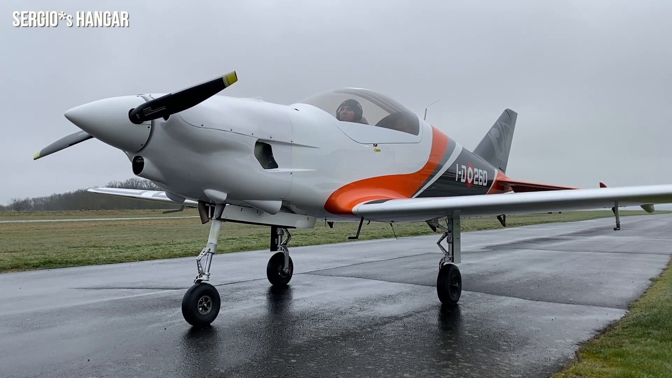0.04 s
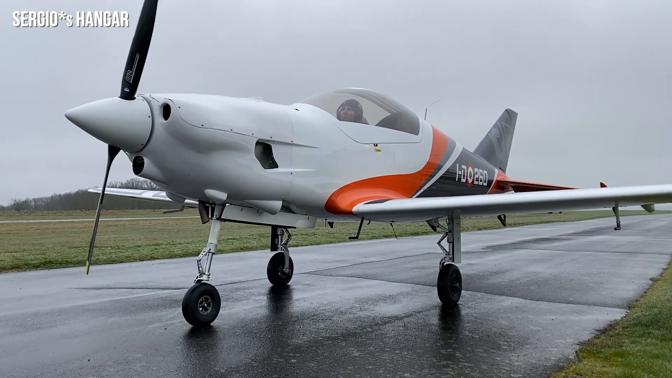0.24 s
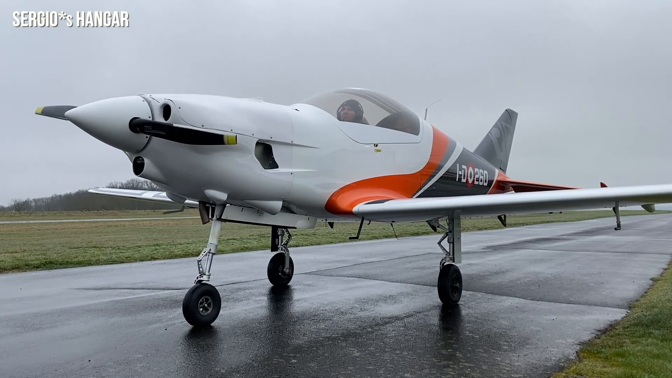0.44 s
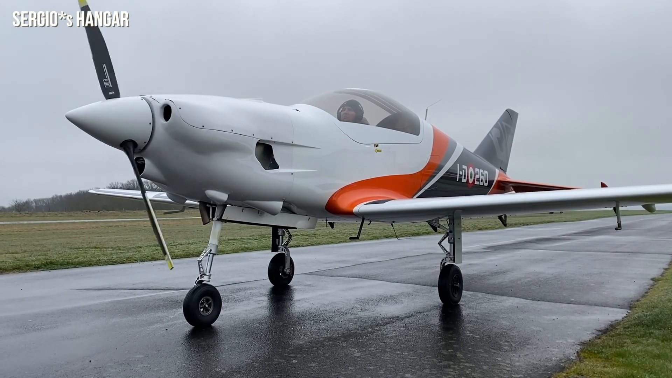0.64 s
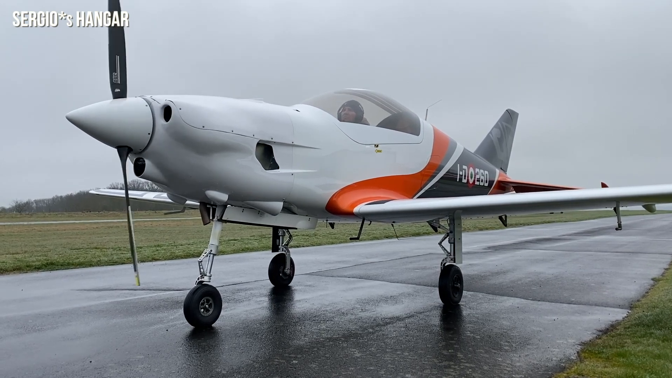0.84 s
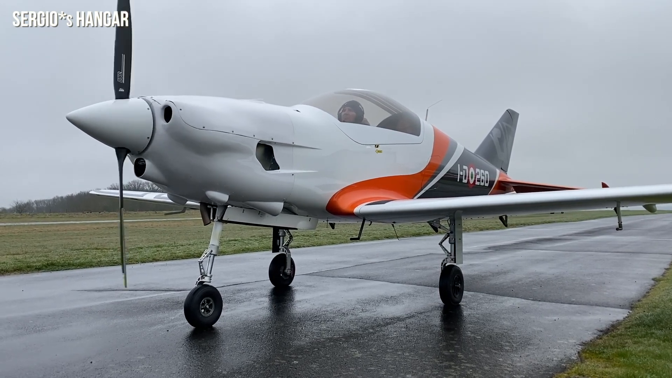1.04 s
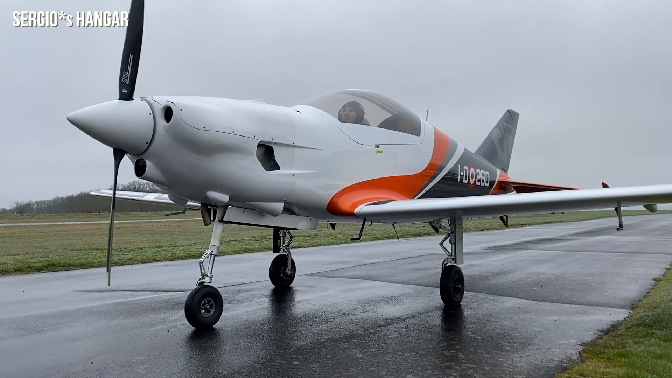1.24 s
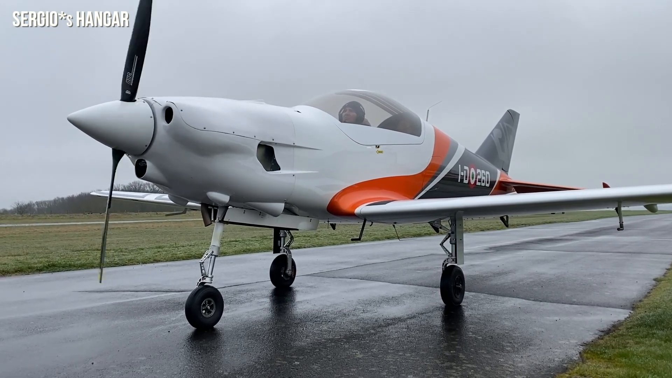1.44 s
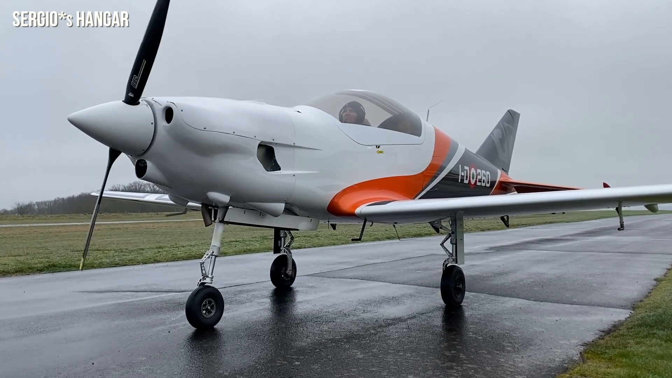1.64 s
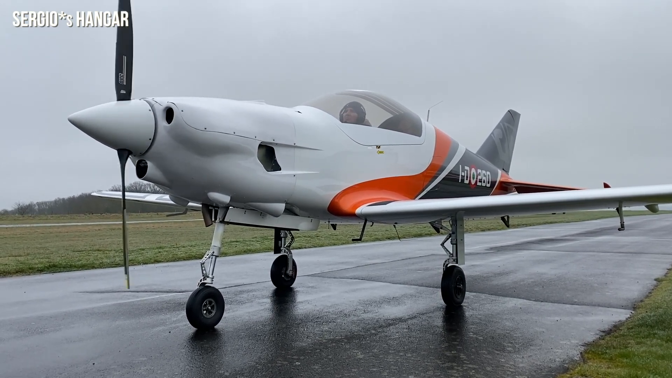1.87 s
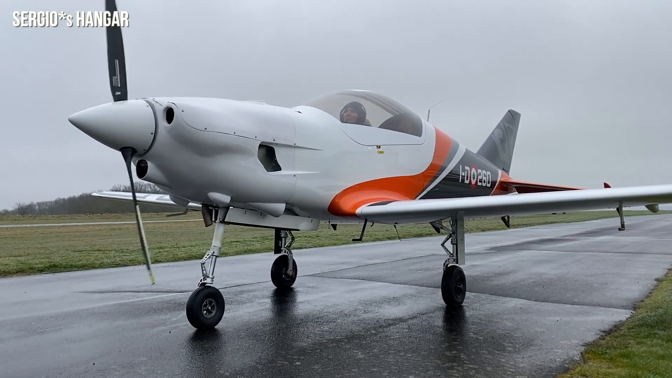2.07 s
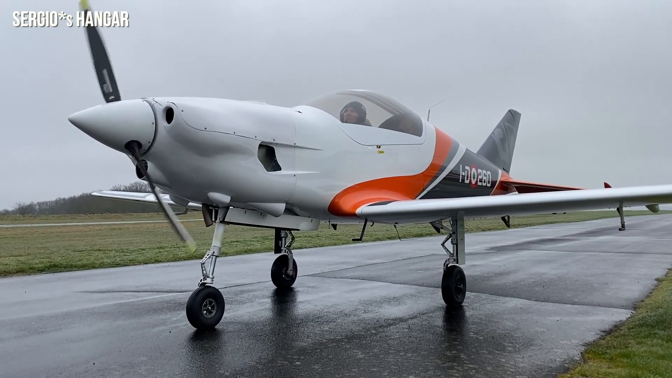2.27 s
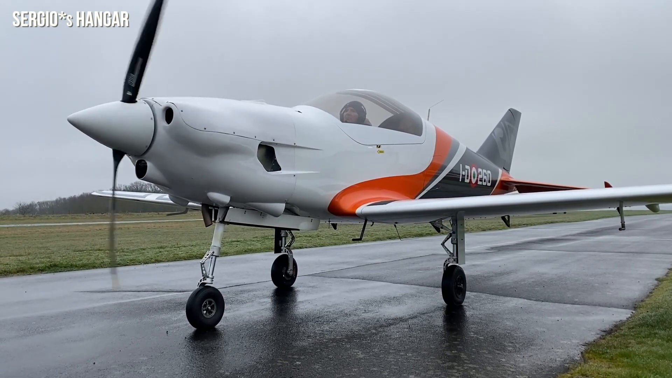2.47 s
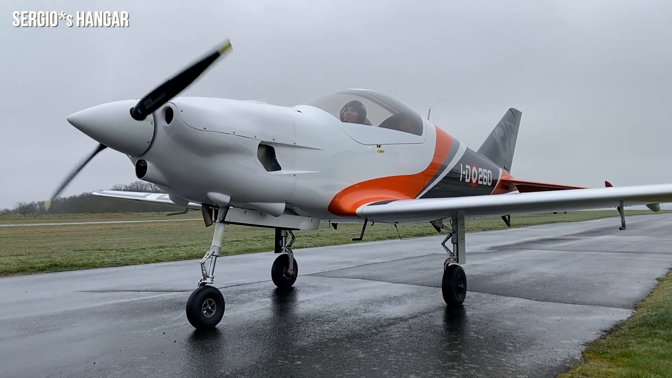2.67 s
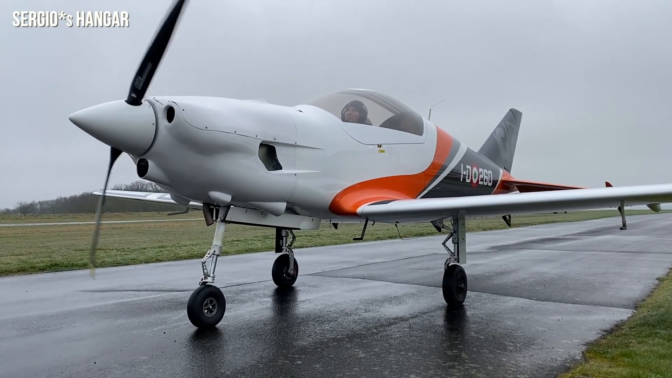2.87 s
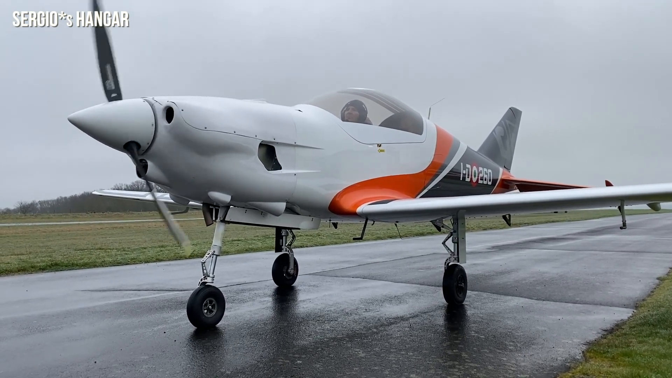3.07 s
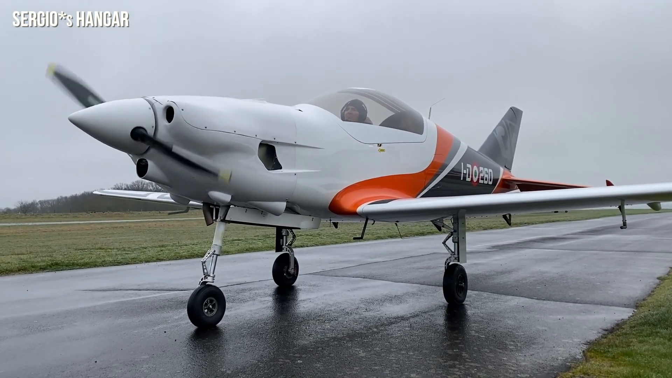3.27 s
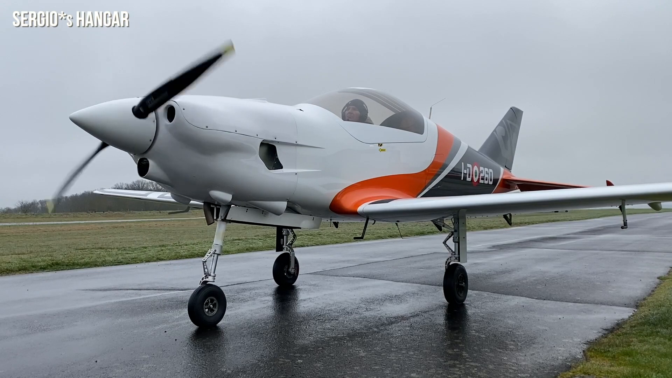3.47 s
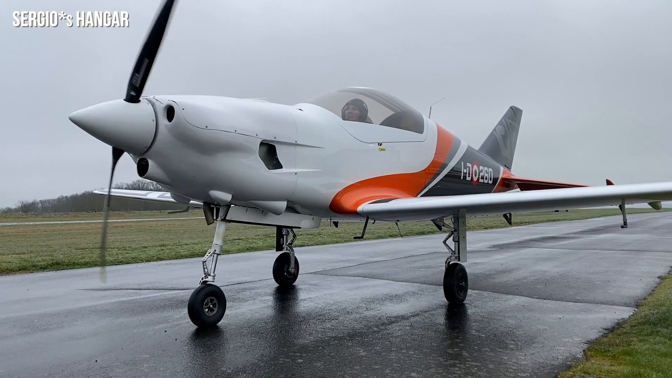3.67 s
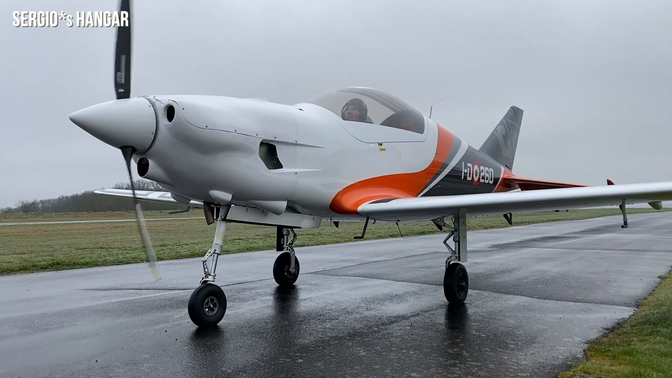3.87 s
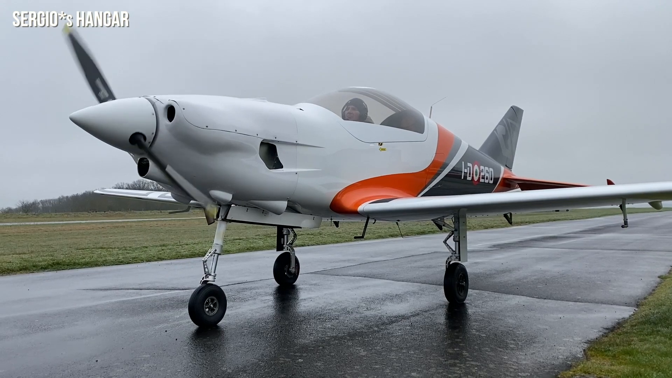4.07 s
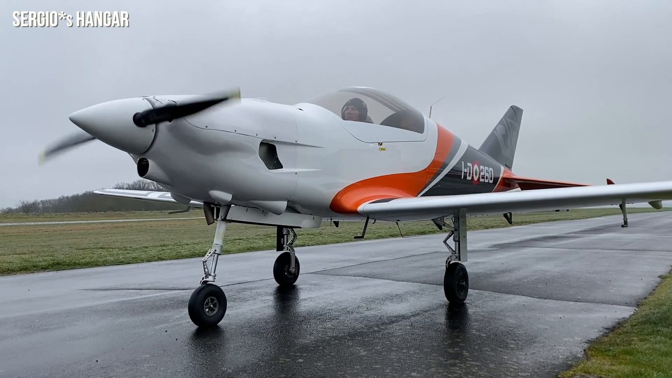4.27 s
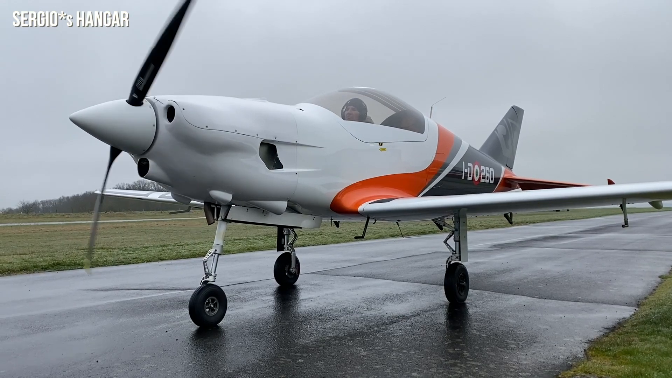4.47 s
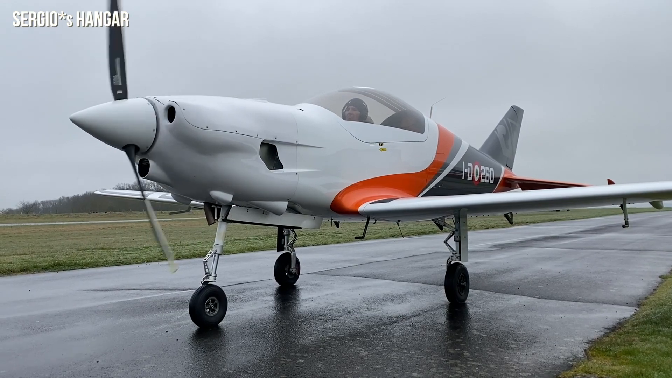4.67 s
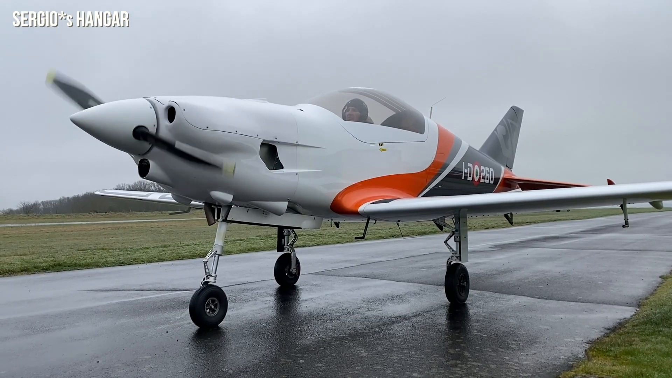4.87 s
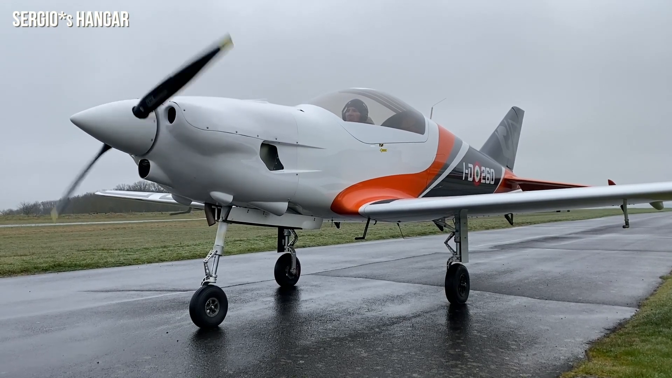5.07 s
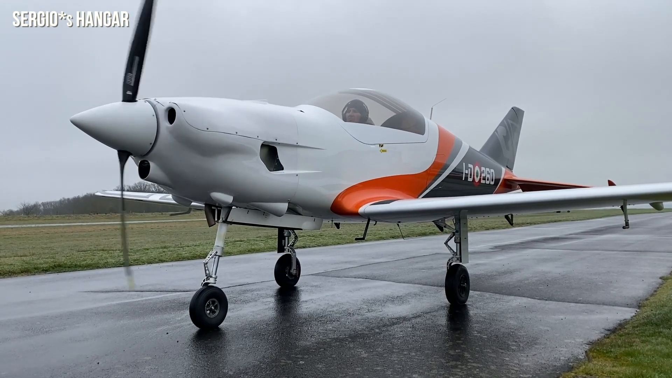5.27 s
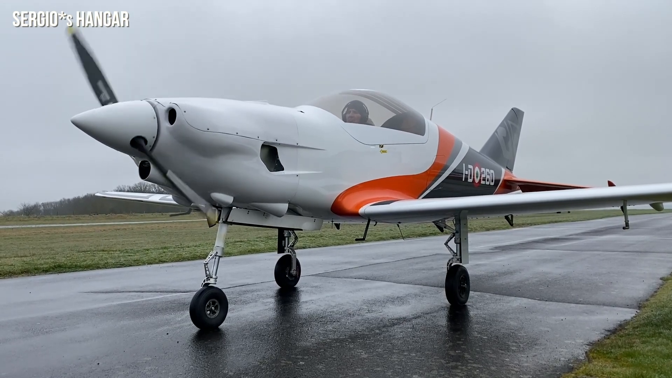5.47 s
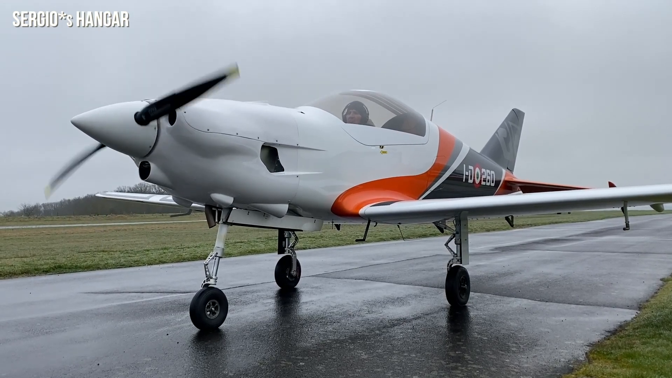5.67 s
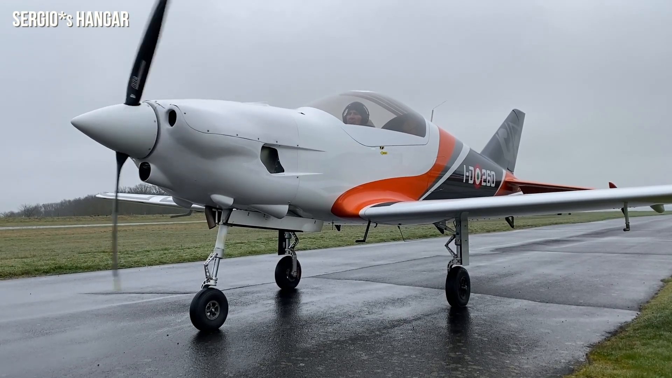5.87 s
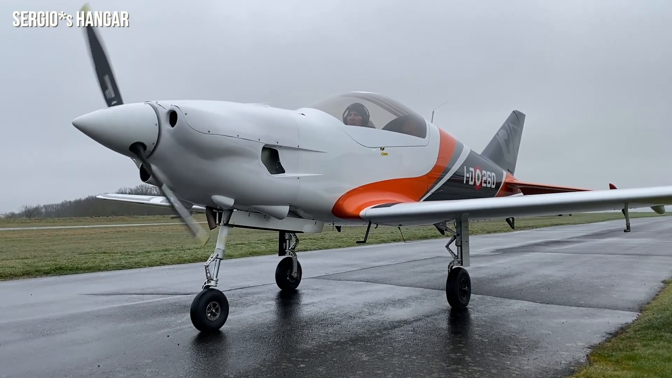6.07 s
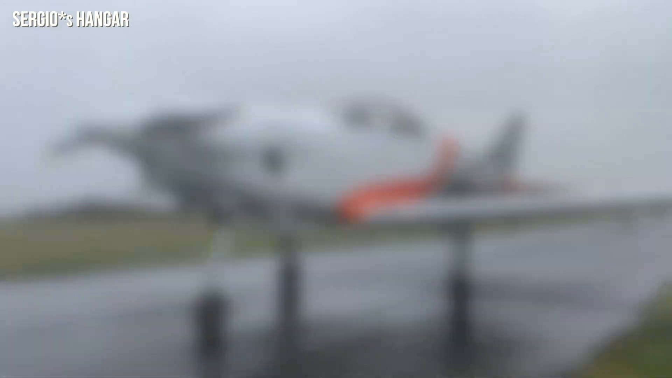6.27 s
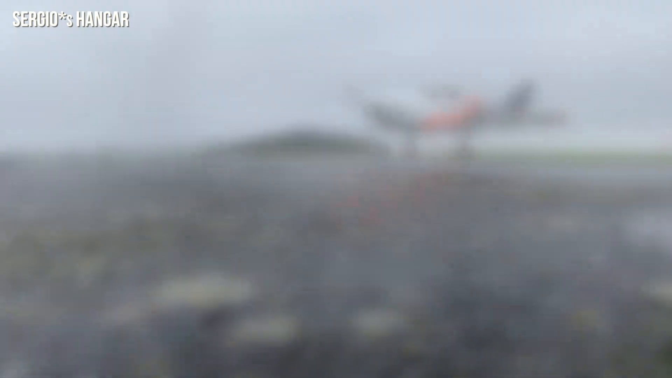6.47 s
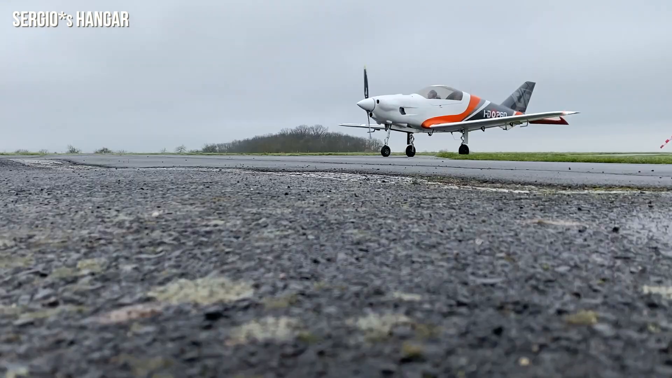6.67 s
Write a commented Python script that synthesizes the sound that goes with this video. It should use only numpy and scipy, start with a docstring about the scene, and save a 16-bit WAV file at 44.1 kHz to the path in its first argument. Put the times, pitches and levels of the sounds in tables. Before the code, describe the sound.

A small propeller aircraft starts up outdoors, a few metres from a stereo microphone. Over a faint fuel pump whine, the starter clacks in and cranks with a rhythmic, whining gear clatter. After about two seconds the engine fires with spits and low booms, stumbles briefly, then settles into a loud, steady idle of exhaust thumps, propeller slaps, hiss and valve rattle.

```python
"""A six-cylinder light aircraft engine starts on a wet apron, a few metres from a stereo pair.
A fuel pump whines, the starter clacks in and labours over each compression. The first firings spit
and boom from the exhaust; the engine stumbles twice and settles into three exhaust thumps and two
propeller blade slaps a turn, with gas hiss, valve rattle and now and then a harder, ringing slap."""
import sys
import numpy as np
from scipy import signal
from scipy.fft import rfft, irfft, next_fast_len
from scipy.io import wavfile
from scipy.ndimage import uniform_filter1d

SR = 44100
rng = np.random.default_rng(int(sys.argv[2]) if len(sys.argv) > 2 else 0)


def dump_mix(stems):
    """Bounce the given channels to the path in sys.argv[1] as a 16-bit WAV at rate SR."""
    frames = np.atleast_2d(stems).T  # one column per channel
    limited = np.clip(frames, -1, 1)  # hard clip at full scale
    pcm = np.round(limited * 32767).astype(np.int16)
    wavfile.write(sys.argv[1], SR, pcm)


N = 296352
T = np.arange(N) / SR

# The hardest blade slaps. Each row: start in seconds, peak in dB, pitch in Hz.
HARD_SLAPS = [(3.235, -14, 549), (3.263, -13, 603), (3.369, -13, 536), (3.397, -12, 544), (3.426, -10, 622),
              (3.454, -11, 622), (3.483, -10, 544), (3.593, -14, 514), (3.62, -13, 568), (3.704, -12, 533),
              (3.84, -12, 552), (3.927, -12, 641), (3.953, -11, 643), (3.983, -12, 641), (4.01, -13, 595),
              (4.038, -11, 544), (4.066, -12, 608), (4.149, -13, 536), (4.202, -15, 546), (4.228, -13, 474),
              (4.287, -11, 546), (4.311, -14, 415), (4.339, -13, 487), (4.529, -14, 560), (4.559, -13, 611),
              (4.587, -13, 541), (4.615, -12, 549), (4.641, -13, 501), (4.809, -15, 619), (4.836, -13, 627),
              (4.863, -12, 692), (5.034, -11, 1030), (5.089, -11, 991), (5.11, -14, 554), (5.14, -14, 735),
              (5.331, -14, 1110), (5.412, -14, 611), (5.442, -13, 1100), (5.496, -12, 444),
              (5.766, -13, 665), (5.876, -13, 565), (6.095, -11, 423), (6.123, -11, 431), (6.233, -14, 552),
              (6.261, -13, 732), (6.315, -11, 721), (6.37, -12, 525), (6.399, -12, 703), (6.425, -12, 565),
              (6.563, -10, 554)]


def undb(db):
    return 10 ** (np.asarray(db) / 20)


def unit(x):
    return x / np.sqrt(np.mean(x ** 2))


def noise():
    """Two unrelated rows: direct sound for both channels, scattered sound for the right alone."""
    return rng.standard_normal((2, N))


def direct(x):
    """A sound with no scattered part."""
    return np.array([x, 0 * x])


def with_echo(x, delay_s=.016):
    """A sound and its scattered return from the apron and airframe."""
    return np.array([x, np.interp(T - delay_s, T, x)])


def lowpass(x, hz, poles):
    return signal.sosfilt(signal.butter(poles, hz, fs=SR, output="sos"), x)


def colour(x, points):
    """Causal EQ through (Hz, dB) points, built from the cepstrum of the log gain."""
    hz, db = np.transpose(points)
    curve_db = np.interp(np.log(np.arange(4097) * SR / 8192 + 1), np.log(hz), db)
    cepstrum = irfft(np.log(undb(curve_db)))
    cepstrum[1:4096] *= 2
    impulse = irfft(np.exp(rfft(cepstrum[:4097], 8192)))
    return signal.fftconvolve(x, impulse[None], axes=1)[:, :N]


def ring(x, modes):
    """Parallel (Hz, width Hz, dB) resonances; alternate signs fill the gaps between them."""
    return sum((-1) ** k * undb(db) * signal.lfilter(*signal.iirpeak(hz, hz / width, SR), x)
               for k, (hz, width, db) in enumerate(modes))


def wander(rate):
    """Random values joined by straight lines, rate times a second."""
    count = int(T[-1] * rate) + 2
    return np.interp(T, np.arange(count) / rate, rng.standard_normal(count))


def flicker(rate, db):
    """Gain that wanders by about db."""
    return undb(db * wander(rate))


def burst(start, db, t60_s, rise_s):
    """Envelope of a sudden outburst that dies away."""
    age = np.maximum(T - start, 0)
    return undb(db - 60 * age / t60_s) * (1 - np.exp(-age / rise_s))


def beats(count, scatter_db):
    """Pulses where count passes a whole number, the phase since, and the size of the current beat."""
    beat = np.floor(count).astype(int) + 1
    size = undb(scatter_db * rng.standard_normal(beat.max() + 1))[beat]
    return size * np.diff(beat, prepend=beat[0]), count % 1, size


def airfield():
    """Quiet open air, mostly low rumble."""
    # Each row: frequency in Hz, relative level in dB.
    air_eq = [(18, -65), (30, 1), (266, -1), (1320, -32), (1970, -16), (2730, -36), (3600, -22.5),
              (6910, -35), (8660, -34), (9580, -26), (12000, -50), (15600, -92), (22000, -120)]
    return undb(-43) * unit(colour(noise(), air_eq))


def fuel_pump():
    """The pump's thin, steady whine."""
    # Each row: pitch in Hz, relative level in dB.
    partials = [(979.8, -63), (1125, -63), (1470, -59), (1960, -59.5)]
    return direct(sum(undb(db + 9) * np.sin(2 * np.pi * (hz * T + rng.random())) for hz, db in partials))


def clacks():
    """The solenoid throws the pinion into the ring gear, where it knocks again as the load reverses."""
    # Each row: start in seconds, level in dB.
    knocks = [(0.099, -15.5), (0.1335, -14.5), (0.590, -34), (0.8999, -30), (1.186, -35), (1.3179, -30)]
    # Each row: frequency in Hz, relative level in dB.
    knock_eq = [(300, -7), (1000, 3), (2500, -5.5), (6000, -11.5), (10000, -13), (12000, -22), (15000, -38)]
    envelope = sum(burst(start, db, t60_s=.11, rise_s=.0089) for start, db in knocks)
    return envelope * unit(colour(noise(), knock_eq))


def gear_hum(phase):
    """Narrow noise on the mesh rate: it falls as compression slows the starter, and blooms mid-stroke."""
    fast_hz, slow_hz, bloom_db = 304, 222.2, 8
    mesh_hz = fast_hz + (slow_hz - fast_hz) / (1 + np.exp((.3 - phase) / .043))
    angle = 2 * np.pi * np.cumsum(mesh_hz) / SR
    drift = lowpass(noise(), hz=20.3, poles=2)
    bloom = undb(bloom_db * np.exp(-((phase - .58) / .28) ** 2))
    return direct(bloom * unit(drift[0] * np.cos(angle) + drift[1] * np.sin(angle)))


def gear_clatter(phase, cranking):
    """Teeth ring the case and pinion: a whine that falls over each stroke, and a bright rasp."""
    # Resonances. Each row: pitch in Hz, width in Hz, gain in dB.
    case_modes = [(476, 32, -3), (623, 32, -2), (637, 103, -2.5), (725, 42, 4), (1000, 92, -7.5),
                  (1078, 73, -1), (1264, 96, -10), (1552, 75, -7)]
    pinion_modes = [(1885, 130, 2.5), (2340, 380, -4.5), (3280, 490, -4.5), (4870, 55, -1.5),
                    (5520, 260, -7), (7200, 1900, -13), (9750, 850, -19)]
    teeth = flicker(400, 1.6) * flicker(36.5, .39)
    case, pinion = (sum(flicker(16, 1.7) * ring(teeth * noise(), [mode]) for mode in modes)
                    for modes in (case_modes, pinion_modes))
    read_at = np.cumsum(1 + .057 * cranking * (.5 - phase))  # varispeed bends the pitch
    whine = unit(np.array([np.interp(read_at, np.arange(N), row) for row in case]))
    rasp = flicker(29.94, 1.8) * unit(lowpass(pinion, hz=11000, poles=6))  # dulled by the cowling
    return whine, rasp


def starter(off_s=2.2):
    """Past each top dead centre the gears race and clatter, then sag under the next compression."""
    # Each row: start in seconds, level in dB, relative sag in dB, rise in seconds, treble lift in dB.
    strokes = [(0.129, -22.5, 2.5, 0.0054, -2), (0.268, -21, 0.5, 0.043, -4), (0.413, -29, 2, 0.0051, -4.5),
               (0.577, -22.5, 5, 0.0047, 2.5), (0.738, -23, 5, 0.0056, 1), (0.893, -21.5, 6.5, 0.0044, 3),
               (1.043, -22, 6, 0.0075, 3), (1.183, -21, 4, 0.0021, -1), (1.315, -23, 5, 0.0045, 2),
               (1.459, -22, 6, 0.0036, 1), (1.596, -23, 5, 0.007, 1.5), (1.735, -21.5, 6, 0.0045, 3.5),
               (1.878, -20.5, 5, 0.0053, 1), (2.008, -23, 1.5, 0.0034, 2.5)]
    # The rocking airframe. Each row: pitch in Hz, width in Hz, gain in dB.
    airframe_modes = [(56.7, 10.4, 3.5), (115, 12, -1), (159, 92, -9.5), (228.6, 12, -4)]
    start, db, sag, rise, bright = np.transpose(strokes)
    count = len(start)
    place = np.interp(T, np.append(start, off_s), np.arange(count + 1), left=-1)
    k, phase = np.clip(place.astype(int), 0, count - 1), place % 1
    cranking = (place >= 0) & (place < count)

    def envelope(lift_db, depth, droop):
        """Each stroke climbs from where the last one ended, then droops."""
        peak = db + lift_db
        last_end = np.roll(peak - depth * sag * droop[-1], 1)
        climb = (last_end - peak)[k] * np.exp(-np.abs(T - start[k]) / rise[k])
        return uniform_filter1d(cranking * undb(peak[k] + climb - depth * sag[k] * droop[:-1]), size=200)

    span = np.append(phase, 1)  # the extra point is the end of a stroke
    late_droop = 1 / (1 + np.exp((.6 - span) / .077))
    early_droop = np.sin(2.4 * span)  # the treble dips sooner and partly recovers
    sluggish_db = 4.5 * np.exp((start[0] - start) / .33)  # fades as the gears gather speed
    first_bass_db = 6.5 * (start == start[0])  # the first stroke carries extra bass
    hum_db = -14.5 - .61 * sluggish_db + 3.2 * rng.standard_normal(count)
    hum = envelope(hum_db, 1.3, late_droop) * gear_hum(phase)
    rocking = envelope(-7.5 + first_bass_db, 1, late_droop) * unit(ring(noise(), airframe_modes))
    whine, rasp = gear_clatter(phase, cranking)
    return (hum + rocking + envelope(-6.5, 1.6, late_droop) * whine
            + envelope(-13.5 - sluggish_db + bright, 1.43, early_droop) * rasp)


def crank_order(k, db, angle):
    """One crank harmonic: firings and blades dip together and rebound, the uneven cylinder comes late."""
    rebound_rad, late_rad = .45, .22
    in_step = k % 3 == 0 or (k % 2 == 0 and k > 7)
    offset = rebound_rad if in_step else -k * late_rad
    slip = .035 * wander(2.5)  # timing drifts, so high orders lose step first
    waver = flicker(9, 1 if k == 3 else 1.6)  # the firing order is steadiest
    return -undb(db) * waver * np.cos(k * (angle + slip) + offset)


def drone(turns, thump, upper_lift, growl, buzz):
    """The pitched engine in four bands of crank harmonics: threes are firings, twos are blades."""
    # Each row: multiple of the crank rate, level within its band in dB.
    orders = [(1, -24), (2, -1.5), (3, 9.5), (4, -1), (5, -9.5), (6, -5), (7, -14), (8, -16), (9, -16),
              (10, -10), (11, -26), (12, -6), (13, -17), (14, -11), (15, -12.5), (16, -8.5), (17, -54),
              (18, -21.5), (19, -38), (20, -18), (21, -58), (22, -13.5), (23, -55), (24, -20.5), (25, -37),
              (26, -14.5), (27, -39), (28, -32), (29, -18), (30, -16.5), (31, -58), (32, -24.5), (33, -44),
              (34, -14.5)]
    _, _, size = beats(3 * turns, scatter_db=.99)
    angle = 2 * np.pi * (turns - .86)  # zero where firing and blade meet
    deep, upper, middle, high = (unit(sum(crank_order(k, db, angle) for k, db in band))
                                 for band in (orders[:4], orders[4:8], orders[8:17], orders[17:]))
    low = undb(-3) * deep + undb(-3.5) * upper_lift * upper
    tone = thump * low + undb(-1.5) * growl * middle + undb(-4) * buzz * high
    return with_echo(uniform_filter1d(size, size=200) * tone)


def propeller(turns, level, ring_lift):
    """Each blade slaps the air with a crack and a pitched ring, and drags a wash behind it."""
    # Air torn by the blades. Each row: frequency in Hz, relative level in dB.
    wash_eq = [(30, 3.5), (90, 2.5), (280, -8.5), (350, -20.5), (620, 0), (830, -10), (1050, -2.5),
               (1700, -9), (2000, 3), (3000, -44.5), (4000, -49)]
    # Each row: pitch in Hz, width in Hz, gain in dB.
    slap_modes = [(540, 320, 4), (676, 51, 16), (685, 38, 8), (1100, 92, -14), (1547, 86, 14.5),
                  (2140, 160, -15)]
    pulses, phase, size = beats(2 * turns - .66, scatter_db=.8)
    sweep = size * np.exp(-((phase + .5) % 1 - .55) ** 2 / .022)  # loudest as a blade sweeps nearest
    wash = unit(colour((.5 + sweep) * flicker(14, .99) * noise(), wash_eq))
    wash /= ring_lift ** .34  # thins as the ring grows
    torn_air = sweep ** 2 * noise()
    crack = unit(sum(flicker(18, 3.5) * ring(torn_air, [mode]) for mode in slap_modes))
    tone = undb(-8.5) * level * ring_lift * unit(ring(-pulses, slap_modes))
    return with_echo(tone) + level * (undb(2.5) * wash + undb(-7) * crack)


def gas_and_valves(turns):
    """Each firing pushes out a puff of hissing gas and rattles the valve gear."""
    # Each row: frequency in Hz, relative level in dB.
    gas_eq = [(1200, 5), (2300, -2.5), (3050, -4.5), (3700, -7), (5500, -5), (6500, -8), (8500, -6),
              (10000, -6.5), (12000, -13), (13500, -21), (15000, -27), (15400, -46)]
    # Each row: pitch in Hz, width in Hz, gain in dB.
    valve_modes = [(2390, 88, -17), (3026, 300, 5), (5700, 330, 3)]
    _, phase, size = beats(3 * turns - .68, scatter_db=3)
    puff = size * np.exp(-phase / .4) * np.minimum(phase / .029, 1)
    gas = unit(colour((2 + puff) * flicker(16, .067) * noise(), gas_eq))
    rattle = unit(ring((1.6 + puff) * flicker(150, 5.1) * noise(), valve_modes))
    return undb(7.5) * gas + undb(-6) * rattle


def slap_ducking(depth=.6, width_s=.012):
    """Gain that dips the ordinary slap wherever a hard one sounds."""
    dips = sum(np.exp(-((T - start) / width_s - .4) ** 2) for start, *_ in HARD_SLAPS)
    return 1 - depth * np.minimum(dips, 1)


def engine():
    """The engine catches, stumbles and idles; one crank times the blades, gas and drone."""
    # Each row: time in seconds, crank speed in turns per second.
    speed = [(2.1, 5.46), (2.22, 10.82), (2.32, 14.21), (2.38, 16.77), (2.47, 17.96), (2.58, 21.2),
             (2.63, 16.87), (2.73, 14.41), (2.78, 17.95), (2.83, 14.42), (2.9, 17.47), (3.05, 18.7),
             (3.2, 17.92), (3.3, 17.95), (3.42, 18.2), (3.62, 18.15), (3.85, 17.88), (4.15, 18.12),
             (4.5, 18.2), (5.7, 18.27), (6.72, 18.25)]
    # Each row: time in seconds, then firing strength, propeller load and growl in dB against idle.
    effort = [(2.133, -12, -6, -20), (2.2, 1.5, -4, -2), (2.27, -1.5, -4.5, 5.5), (2.32, -6.5, -6.5, -6),
              (2.36, 3, -6.5, 4), (2.5, 2, -3, -0.5), (2.599, 0, -11, -7), (2.65, -3, -9.5, -2),
              (2.72, -1.5, -11, -10), (2.77, 0, -5.5, 1), (2.94, 5, 1, 3.5), (3.12, 2, -5, 5.5),
              (3.4, 2, 0, 6.5), (3.75, 2, -1.5, 0), (4.0, 1.5, -1, 4), (4.5, 1.5, -1, 3),
              (4.8, 2.5, -2.5, 1), (5.05, 2, -2.5, 3.5), (5.7, 2, -1.5, 0.5), (6.05, 2, -1, 4),
              (6.35, 2.5, 1.5, 4), (6.72, 1.5, -2, 1)]
    # Each row: time in seconds, lift of the upper thump in dB, lift of the blades' ring in dB.
    overtones = [(2.3, -2.5, 1.5), (2.5, 1, 1.5), (2.62, -8, 4), (2.72, -5, 5), (2.79, 5, 2.5),
                 (2.9, 2, -5), (3.2, -3, 6), (3.45, 0, 0), (3.7, -3.5, 5), (4.0, 0.5, 0), (4.3, -0.5, -2),
                 (4.7, -1, 2.5), (5.5, -2, -2.5), (6.1, -2.5, 0.5), (6.5, 1.5, 0.5), (6.72, 1, 2.5)]
    turns = .6 + np.cumsum(np.interp(T, *np.transpose(speed), left=0)) / SR
    times, *curves = np.transpose(effort)
    firing_db, load_db, growl_db = (np.interp(T, times, db, left=-200) for db in curves)
    times, *curves = np.transpose(overtones)
    upper_lift, ring_lift = (undb(np.interp(T, times, db)) for db in curves)
    thump = undb(-18.5 + firing_db)
    growl = undb(-25.5 + growl_db) * flicker(5.6, 1.5)
    slap = undb(-24.5 + load_db) * flicker(6, .4) * slap_ducking()
    hiss = undb(-29 + .9 * firing_db + .35 * load_db)
    return (propeller(turns, slap, ring_lift) + hiss * gas_and_valves(turns)
            + drone(turns, thump, upper_lift, growl, buzz=slap * ring_lift))


def spits(rise_s=.004):
    """Early firings crack out of the cold pipes as ragged metallic hiss that lingers faintly."""
    # Each row: start in seconds, relative level in dB, seconds to fall by 60 dB.
    firings = [(2.139, -2, .08), (2.183, -5.5, .07), (2.218, -6, .1), (2.246, -4, .05), (2.2725, -6, .05),
               (2.344, -10, .07), (2.366, -12, .08), (2.389, -7.5, .035), (2.409, -8.5, .055),
               (2.429, -10.5, .05), (2.447, -14, .06), (2.464, -13, .05), (2.501, -17, .08),
               (2.52, -18, .08), (2.739, -16, .2), (2.789, -14, .15), (2.809, -17, .15), (2.8294, -18, .2),
               (2.927, -18, .3), (3.0355, -16, .3)]
    # Each row: pitch in Hz, width in Hz, gain in dB.
    metal_modes = [(2040, 570, 1), (2600, 390, 1.5), (3050, 185, 8), (4880, 200, 2.5), (5630, 440, 5.5),
                   (7450, 1900, -0.5), (9650, 2100, -1.5), (13500, 2000, -27)]
    cracks = sum(burst(start, db, t60_s, rise_s) for start, db, t60_s in firings)
    tails = sum(burst(start, db - 13.5, .14, rise_s) for start, db, _ in firings)
    hiss = unit(sum(flicker(40, 1.4) * ring(noise(), [mode]) for mode in metal_modes))
    return undb(-5) * (cracks + tails) * flicker(250, 2.5) * hiss


def booms():
    """Slugs of gas from the first firings swell through the pipes, dip deep and ring out."""
    # Each row: time of the deepest pressure dip in seconds, its level in dB.
    firings = [(2.161, -21), (2.203, -9.5), (2.237, -16), (2.261, -12.5), (2.288, -8.5), (2.364, -21),
               (2.424, -20), (2.480, -19), (2.532, -16), (2.614, -26), (2.742, -21), (2.802, -23),
               (2.823, -21)]
    # Each row: pitch in Hz, width in Hz, gain in dB.
    pipe_modes = [(59.2, 28, 0), (99, 50, -4), (189, 120, -8)]
    times, db = np.transpose(firings)
    boom = ring(ring(signal.unit_impulse(6000), pipe_modes), pipe_modes[:1])
    slugs = np.zeros(N)
    slugs[(times * SR).astype(int) - np.argmin(boom)] = undb(db)
    return direct(signal.fftconvolve(slugs, boom / -boom.min())[:N])


def hard_slaps(width_hz=140, length=2000):
    """Now and then a blade hits the air much harder and the slap rings clear, each at its own pitch."""
    track = np.zeros(N + length)
    for start, db, hz in HARD_SLAPS:
        mode = [(hz, width_hz, 0)]
        click = ring(signal.unit_impulse(length), mode)
        slap = ring(click, mode) + .3 * click  # the ring builds up behind a sharp front
        track[int(start * SR):][:length] -= undb(db) * slap / np.abs(slap).max()
    return direct(track[:N])


def scene():
    """The aircraft in stereo: the right side is later, duller in the middle and partly scattered."""
    # Each row: frequency in Hz, likeness of the channels from 0 to 1, left minus right in dB.
    stereo_image = [(60, .99, -1.5), (150, .97, -2), (300, .975, -.5), (700, .95, 1.3), (1100, .85, 2.6),
                    (1500, .55, 3.5), (2200, .78, 2), (3000, .72, 3), (3700, .45, 5.5), (5500, .5, 4.5),
                    (6500, .7, 0), (8000, .86, 0), (12000, .9, 0)]
    # Each row: frequency in Hz, phase lead of the left channel in half cycles.
    left_lead = [(0, 0), (900, .3), (1450, .52), (1750, .95), (2050, 1.3), (3500, 2.9), (3800, 3.8),
                 (5800, 4.1), (6800, 4), (8400, 3), (9600, 2), (10500, 2), (11450, 1), (12650, 1),
                 (13300, 0), (16000, 0)]
    mix = engine() + hard_slaps() + spits() + booms() + starter() + clacks() + airfield() + fuel_pump()
    size = 2 * (next_fast_len(N + 8192) // 2)  # padding keeps the tail from wrapping round
    left, scattered = rfft(mix, size)
    hz = np.arange(len(left)) * SR / size
    image_hz, *curves = np.transpose(stereo_image)
    likeness, pan_db = (np.interp(np.log(hz + 1), np.log(image_hz), curve) for curve in curves)
    lag = np.exp(-1j * np.pi * np.interp(hz, *np.transpose(left_lead)))
    right = (likeness * left + np.sqrt(1 - likeness ** 2) * scattered) * lag
    return irfft(np.array([left * undb(pan_db / 2), right * undb(-pan_db / 2)]), size)[:, :N]


def record(dry, bass_hz=33, top_hz=15789):
    """Drop the deepest bass, round the loudest peaks and cut the top."""
    thinned = signal.sosfiltfilt(signal.butter(2, bass_hz, "high", fs=SR, output="sos"), dry)
    rounded = np.tanh(.75 * thinned) / .85
    return signal.sosfilt(signal.ellip(10, .2, 80, top_hz, fs=SR, output="sos"), rounded)


dry = scene()
out = record(dry)
dump_mix(out)
```